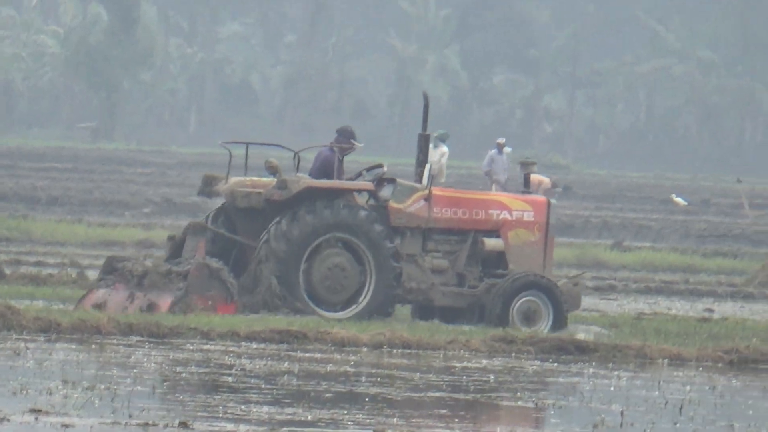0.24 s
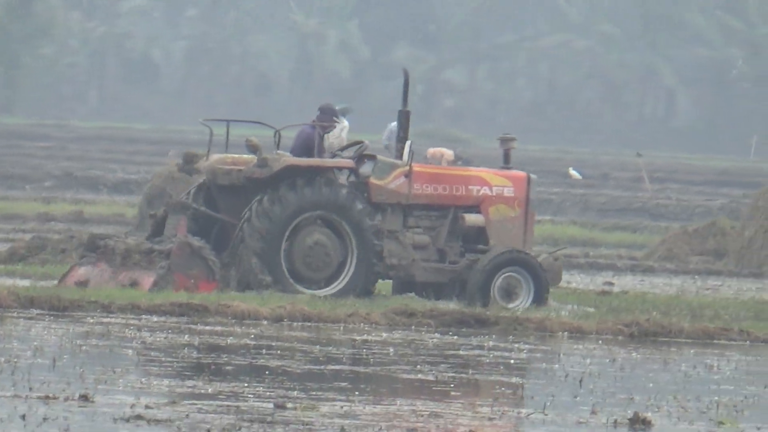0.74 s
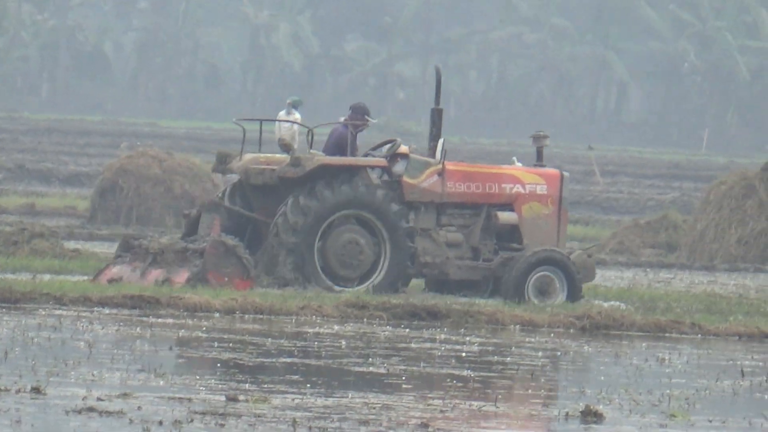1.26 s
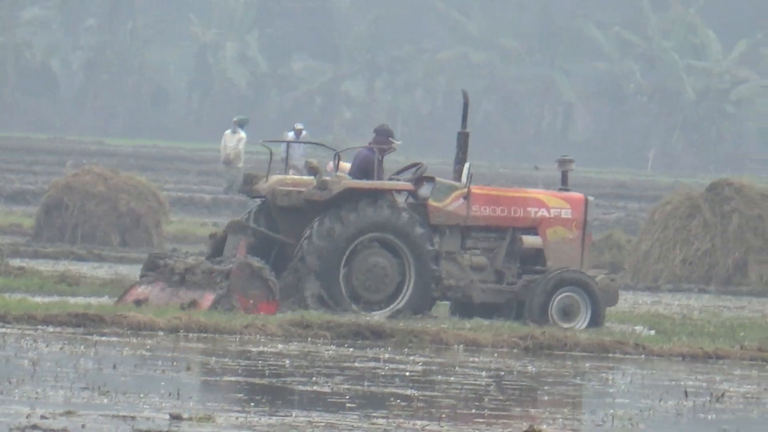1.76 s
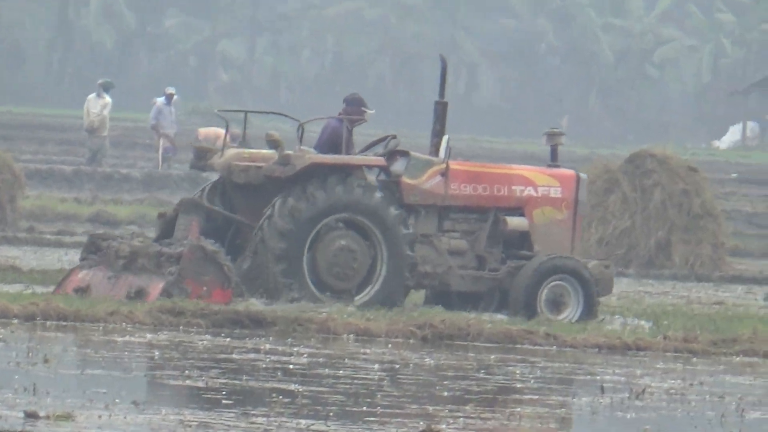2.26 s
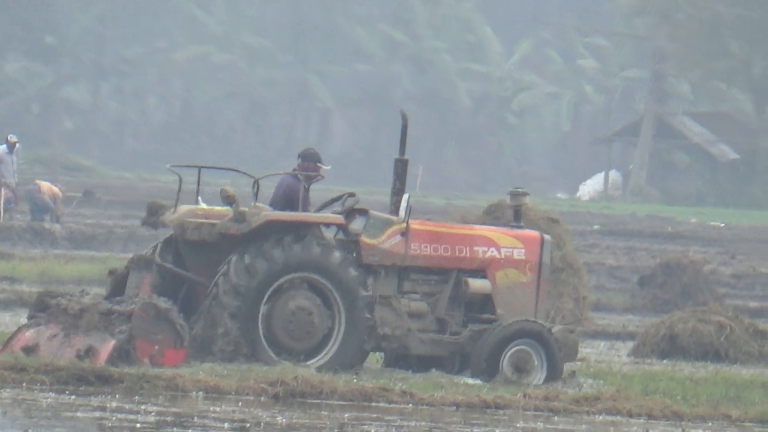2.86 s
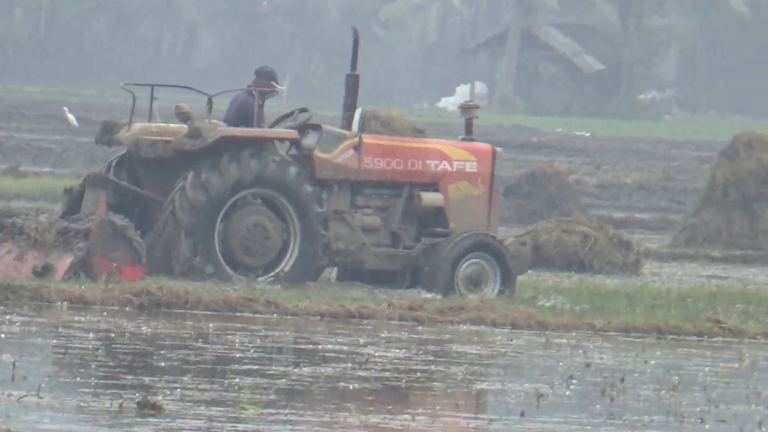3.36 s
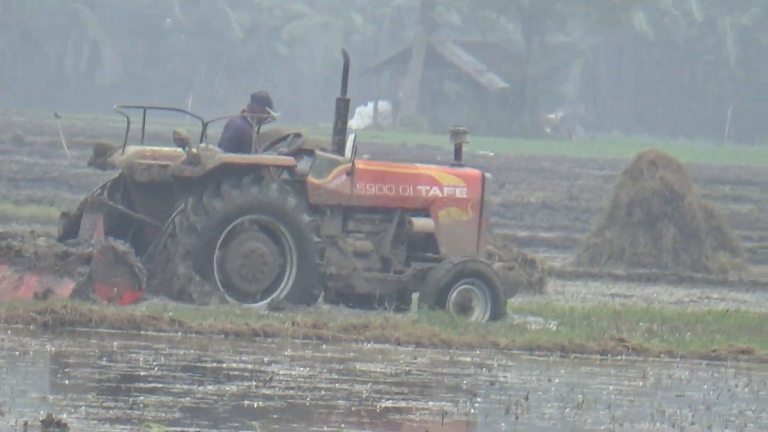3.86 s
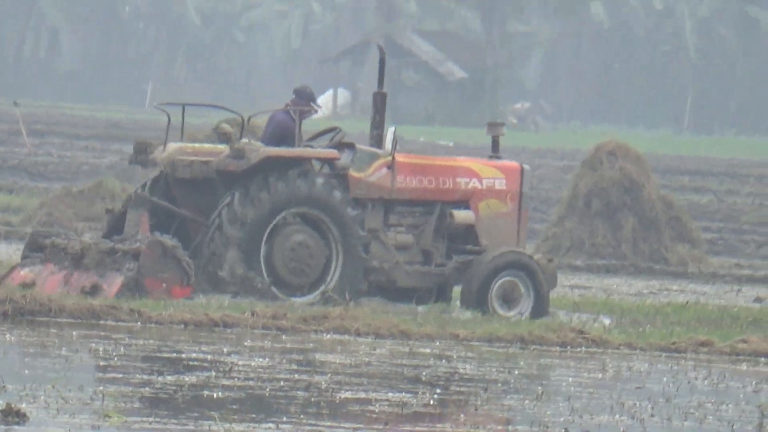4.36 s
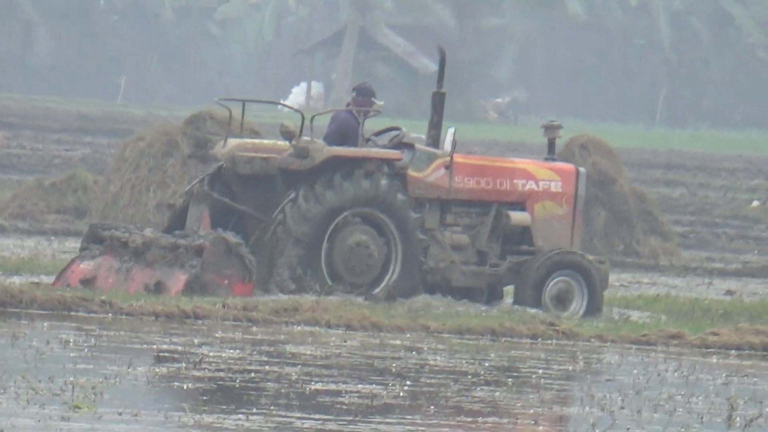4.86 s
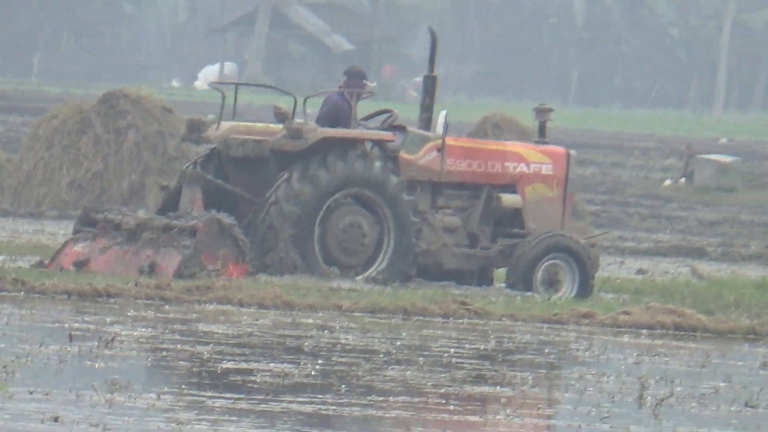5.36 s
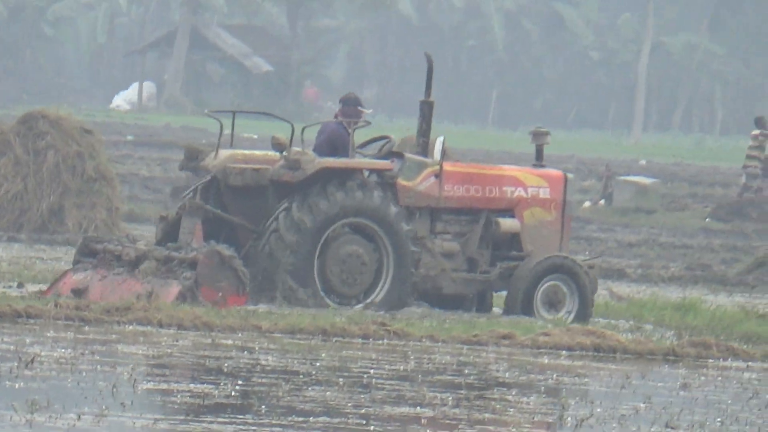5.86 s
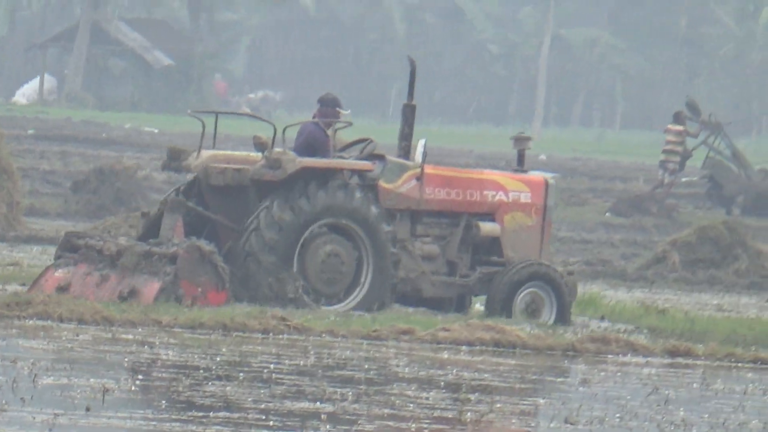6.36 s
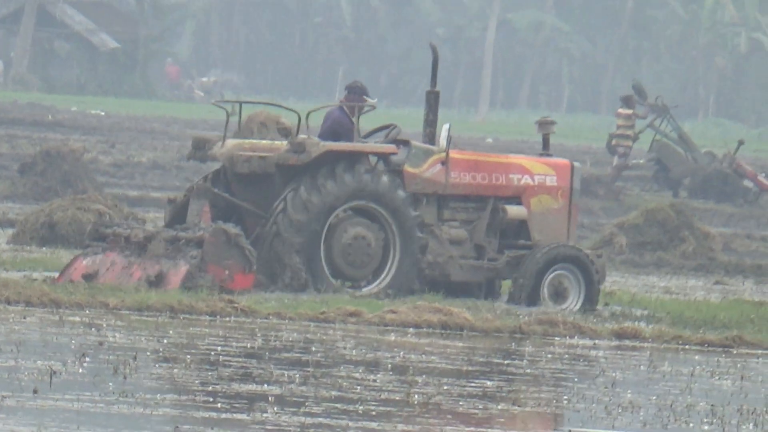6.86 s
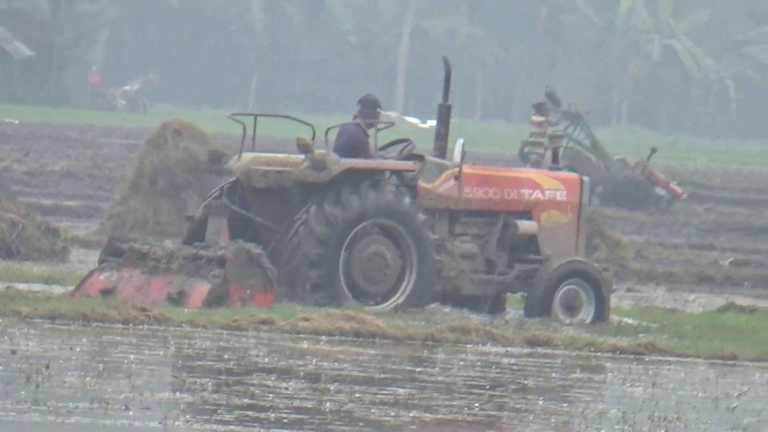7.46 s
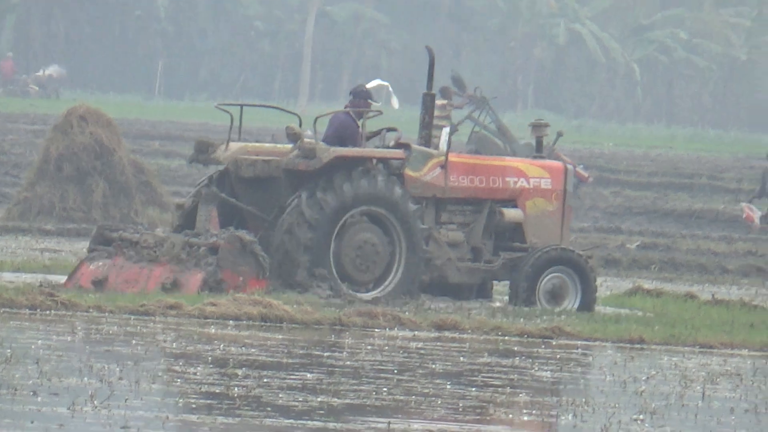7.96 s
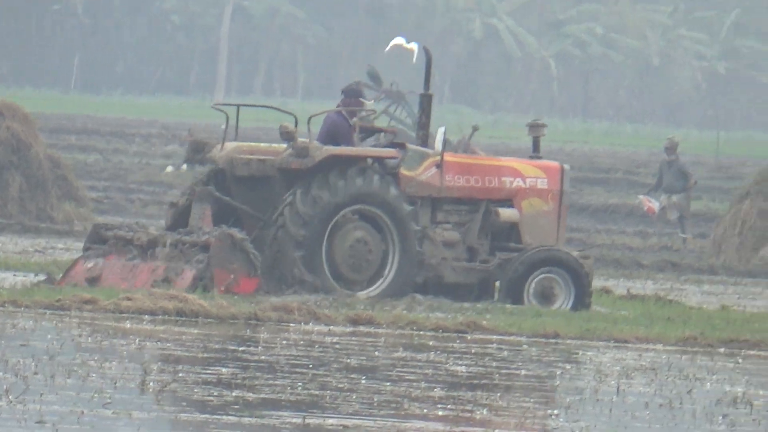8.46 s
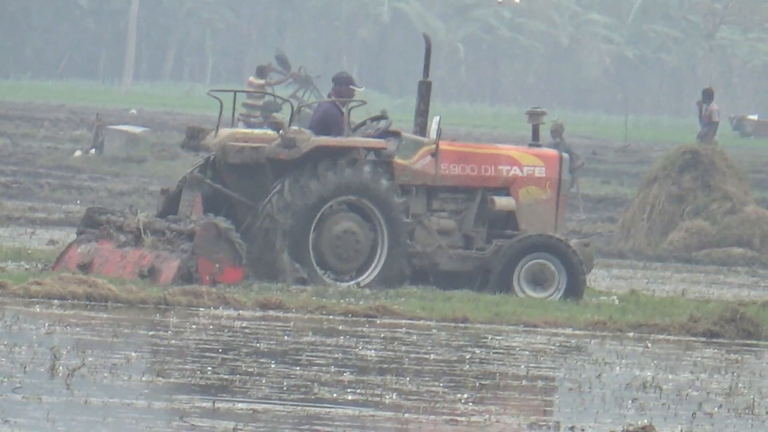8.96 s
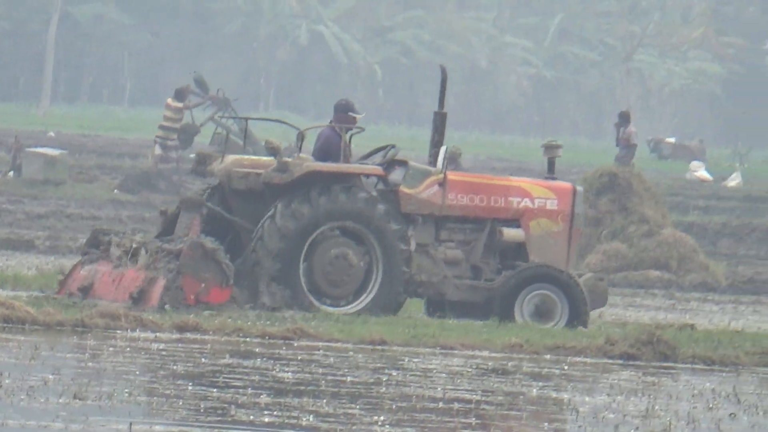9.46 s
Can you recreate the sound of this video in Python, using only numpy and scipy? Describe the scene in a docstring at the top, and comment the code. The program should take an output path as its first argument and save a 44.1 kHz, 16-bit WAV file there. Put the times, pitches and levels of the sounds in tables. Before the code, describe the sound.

Outdoors in a flooded field, a distant diesel tractor runs at steady medium speed, pulling a tiller: soft exhaust puffs, metallic clatter, ticking valve, gear whine and hissing, splashing muddy water. A small bird chirps thinly. After about three seconds, strong wind rumbles, thumps and slaps the unshielded stereo microphone, while the machine becomes fainter but never changes pace.

```python
"""From the start a distant three-cylinder diesel drags a tiller through a flooded field at about 1500 rpm.
Each engine cycle shapes noise into exhaust puffs, knocks and valve ticks; sine tones and noise make gear whine.
Muddy water hisses as filtered noise, a broad hiss swells twice, loose parts tap and a small bird whistles in sines.
From about three seconds wind noise swells, with low thumps, brighter flaps and sharp slaps on the microphone.
The machine grows fainter after that, and some valve ticks land much harder near 1, 5 and 9 seconds."""
import sys
import numpy as np
from scipy import signal
from scipy.fft import rfft, irfft, next_fast_len
from scipy.io import wavfile
from scipy.ndimage import uniform_filter1d, minimum_filter1d

SR = 44100
rng = np.random.default_rng(int(sys.argv[2]) if len(sys.argv) > 2 else 0)


def store_pcm(level_fs):
    """Save levels as 16-bit WAV."""
    pcm = np.round(np.clip(level_fs, -1, 1) * 32767).astype(np.int16)
    wavfile.write(sys.argv[1], SR, np.atleast_2d(pcm).T)


N = 428201
TIME = np.arange(N) / SR  # seconds

# crankshaft speed: (time_s, speed_rpm)
CRANK_SPEED = [(0.0, 1509.2), (1.5, 1505.3), (2.3, 1496.6), (3.2, 1506.2), (4.9, 1502.6), (5.9, 1509.5),
               (6.8, 1512.2), (7.8, 1508.8), (8.8, 1504.9), (9.7, 1504.2)]
START_CYCLE = -.326  # place in the engine cycle at the start
# level of the machine, which falls as it draws past: (time_s, level_db)
MACHINE_LEVEL = [(0, -36.5), (1.7, -35), (3.3, -36.5), (4.1, -40.5), (4.75, -42), (5.35, -40.5), (6.1, -43),
                 (6.8, -42), (7.55, -43.5), (8.4, -40), (8.72, -44), (9.1, -42), (9.71, -41.5)]

# exhaust puff of each cylinder: (place_in_cycle_0_to_1, relative_level_db)
CYLINDER_PUFFS = [(.055, -4.5), (.37, -6), (.7, -13)]
PUFF_RISE_S, PUFF_DECAY_S = 0.004, 0.0059
# exhaust when the machine is at its mean level; dB of exhaust per dB of machine
EXHAUST_DB, EXHAUST_SLOPE = -32.5, 0.56
# tone of the exhaust gas: (pitch_hz, relative_level_db)
EXHAUST_TONE = [(25, -40), (50, -18), (110, 2.5), (190, -4.5), (290, -3), (420, -16), (800, -17.5),
                (1500, -65)]

# knocks within one engine cycle: (place_in_cycle_0_to_1, relative_level_db, decay_s)
BLOCK_KNOCKS = [(.11, 10.5, 0.014), (.56, -2, .006), (.7, 8.5, 0.022), (.815, -4, 0.012)]
# tone of the steady block rattle: (pitch_hz, relative_level_db)
BLOCK_TONE = [(500, -13), (1000, 0.5), (1300, 4), (1550, 2), (1780, 5.5), (2050, -1.5), (2500, 1),
              (3100, -2), (3650, -10.5), (4500, -15), (5500, -22.5), (8000, -24), (15000, -62)]
# tone of the block knocks: (pitch_hz, relative_level_db)
KNOCK_TONE = [(800, 7), (1800, -10), (2400, 17), (3200, 16.5), (4200, -67), (6500, -20), (8300, 8),
              (10000, -3), (12000, -38.5), (15500, -36)]

# strength of the loose valve before trimming: (time_s, bright_snap_db, hollow_clack_db)
VALVE_TICKS = [(.11, -48, -37), (.26, -48, -35), (.5, -37, -35), (.66, -39, -37), (.82, -33, -31),
               (1.14, -39, -30.5), (1.5, -38, -33), (1.78, -38, -34), (2.02, -37, -32), (2.58, -40, -34),
               (2.74, -46, -38), (2.98, -48, -37), (3.22, -41, -33), (3.54, -43, -39), (3.75, -39, -37),
               (4.17, -48, -43), (4.65, -41, -39), (4.97, -46, -40), (5.21, -45, -37), (5.37, -39, -35),
               (5.6, -44, -39), (6.01, -54, -46), (6.4, -49, -41), (6.96, -48, -41), (7.2, -41, -36),
               (7.44, -41, -38), (7.6, -48, -40.5), (8.23, -42.5, -36), (8.55, -49, -39), (8.95, -43, -37),
               (9.19, -48, -37), (9.35, -44, -37), (9.67, -44, -36)]
TICK_SCATTER_DB, TICK_JITTER_S = 1.5, .0005  # chance in strength; chance in timing of every cyclic blow
# tone of the valve snap: (pitch_hz, relative_level_db)
VALVE_TONE = [(3500, -22), (4900, -13), (5600, -1), (6400, -12), (7200, -3), (8300, 0), (9400, 0),
              (10200, -3), (11200, -10.5), (13300, -17.5), (14500, -28), (15500, -35)]
# tone of the valve cover: (pitch_hz, relative_level_db)
COVER_TONE = [(800, -14), (1300, -5), (1800, -5), (2050, -1.5), (2280, 2), (2650, -1.5), (3050, -3),
              (3500, -12), (4200, -19), (6000, -30)]
# the valve now and then lands much harder: (start_s, level_db)
HARD_LANDINGS = [(.983, -30), (1.142, -30), (1.302, -32), (5.132, -29), (5.293, -36), (5.373, -28),
                 (5.452, -30.5), (8.394, -34), (8.632, -36), (8.872, -34), (8.951, -34), (9.271, -36),
                 (9.511, -36)]
# tone of a hard landing: (pitch_hz, relative_level_db)
HARD_TICK_TONE = [(1500, -12), (2000, -3), (2280, 3), (2700, -3), (3400, -2), (4100, -16), (4900, -17),
                  (5600, -13), (6500, -25), (9000, -40)]
HARD_TICK_DECAY_S = .003

# rings of the tappet at the mean clack strength: (pitch_hz, width_hz, level_db, decay_s)
TAPPET_RINGS = [(2520, 330, -63.5, 0.0016), (9330, 180, -70.5, 0.0076)]
TAPPET_PLACE = .83  # place in the cycle, just before the valve
# level of a thin panel that the tappet sets ringing: (time_s, level_db)
PANEL_LEVEL = [(0, -62), (6.3, -61), (7.1, -56.5), (8.45, -54.5), (9.71, -56.5)]
PANEL_HZ, PANEL_WIDTH_HZ, PANEL_DECAY_S = 3420, 130, .03
# level of the tappet's broad knock on the cover: (time_s, level_db)
TAPPET_KNOCK_LEVEL = [(0, -56), (1, -48), (2.2, -56), (7.5, -57), (8.4, -47), (8.7, -53), (9.71, -50)]

# gear mesh tones: (multiple_of_cycle_rate, relative_level_db)
GEAR_TONES = [(23, -6), (66, -9), (70, -5), (71, -2.5), (102, -3.5)]
# tone of the gearbox casing: (pitch_hz, relative_level_db)
GEARBOX_TONE = [(300, -16), (480, -10), (640, -3), (740, -2.5), (820, .5), (900, -1), (1000, -11),
                (1300, -25)]
# howl of the casing compared with the machine: (time_s, relative_level_db)
HOWL_LEVEL = [(0, -1.5), (3, -5), (5.5, -5), (8.2, -1.5), (9.71, 1)]

# tone of the spray in the middle: (pitch_hz, relative_level_db)
SPRAY_TONE = [(2000, 5.5), (4200, 2.5), (5200, 2.5), (7000, 1), (8400, 3.5), (9600, 1), (10600, -4.5),
              (11700, -13), (14000, -18), (15700, -23)]
# tone of the spray that differs between the ears: (pitch_hz, relative_level_db)
SPRAY_SIDE_TONE = [(2000, -1), (4500, 8), (7000, 3.5), (8500, 1), (10000, -42), (15000, -50)]
# spray when the machine is at its mean level; dB of spray per dB of machine
SPRAY_DB, SPRAY_SLOPE = -50, 0.85
# the tines throw up a sheet of water: (peak_s, level_db, half_length_s)
WATER_SPLASHES = [(.95, -48, 0.6), (1.726, -46, 0.35), (5.25, -52, 0.4)]
# one sheet lands at once and patters out
SMACK_S, SMACK_DB, SMACK_RISE_S, SMACK_DECAY_S = 2.43, -40.5, .035, .22
# the hiss dips briefly: (middle_s, depth_db, half_length_s)
HISS_DIPS = [(6.257, -5, 0.076), (8.72, -3, 0.26)]
# a broad hiss swells: (peak_s, level_db, half_length_s)
HISS_SWELLS = [(0.305, -49, .4), (3.1, -48.5, 0.53)]
# tone of the swelling hiss: (pitch_hz, relative_level_db)
HISS_SWELL_TONE = [(2500, -20), (3600, 4), (4300, 2), (5200, -7), (7000, -28)]

# loose parts that rattle at random: (pitch_hz, width_hz, level_relative_to_machine_db)
LOOSE_PARTS = [(1426, 270, -13.5), (1760, 240, -16.5), (2560, 230, -20), (3114, 380, -15.5),
               (3970, 490, -19)]
RATTLE_PER_S, RATTLE_SCATTER_DB, RATTLE_DECAY_S = 40, 3, .004
# loose steel on the tiller: (start_s, relative_level_db, pitch_hz, width_hz, decay_s)
STEEL_CLANKS = [(2.418, -23, 1900, 1000, .003), (2.418, -25.5, 4400, 1300, .002),
                (2.418, -31, 8300, 900, .002), (3.441, -23, 1900, 900, .002), (3.822, -34, 2770, 50, .02),
                (3.853, -29, 1500, 900, .008), (4.974, -31.5, 2230, 70, .007)]

# strength of the wind on the microphone before trimming: (time_s, level_db)
WIND_LEVEL = [(0, -24.5), (.45, -27.5), (.9, -25.5), (1.4, -28), (2.7, -23.5), (3.05, -18), (4.2, -17.5),
              (4.42, -17.5), (4.65, -16.5), (6.5, -18), (6.85, -17), (7.1, -17), (8.3, -18), (8.75, -18),
              (9.71, -20)]
# the wind dips between eddies: (middle_s, depth_db, half_length_s)
WIND_DIPS = [(1.9, -4, .03), (2.88, -3, .02), (3.905, -5, .03), (4.375, -5, .04), (6.79, -4, .04),
             (6.98, -6, .02), (7.6, -3, .02)]
# gusts that swell above the wind, before trimming: (peak_s, level_db)
WIND_GUSTS = [(3.14, -25), (6.25, -24), (6.53, -15.5), (8.61, -17)]
# eddies that thump the microphone, before trimming: (peak_s, rumble_db, flap_db)
WIND_BUFFETS = [(0.019, -15.0, -30.0), (0.108, -14.5, -34.0), (1.683, -15.5, -28.5), (2.819, -17.5, -22.5),
                (2.945, -16.0, -21.5), (3.039, -13.5, -27.0), (3.258, -15.5, -21.5), (3.341, -17.5, -19.0),
                (3.412, -13.5, -21.0), (3.477, -14.5, -22.0), (3.833, -14.0, -19.0), (4.014, -14.0, -20.5),
                (4.092, -12.0, -22.0), (4.191, -13.5, -20.5), (4.297, -13.5, -20.0), (4.677, -15.0, -16.5),
                (4.887, -15.0, -20.0), (4.973, -14.0, -20.5), (5.199, -16.5, -21.0), (5.413, -13.0, -17.0),
                (5.553, -14.0, -27.0), (5.627, -14.0, -24.5), (5.7, -13.0, -22.5), (5.772, -17.0, -18.0),
                (5.829, -16.5, -20.5), (5.986, -14.5, -21.0), (6.207, -14.0, -19.0), (6.282, -15.5, -19.0),
                (6.438, -15.5, -15.0), (6.571, -12.5, -22.0), (7.025, -16.0, -18.5), (7.099, -15.5, -17.0),
                (7.237, -14.5, -19.0), (7.324, -16.0, -19.5), (7.449, -13.5, -21.0), (7.712, -16.0, -17.0),
                (8.007, -19.0, -19.5), (8.565, -12.5, -25.0), (8.754, -15.5, -24.0), (9.031, -16.0, -20.0),
                (9.193, -17.0, -19.5), (9.303, -16.5, -19.5), (9.68, -13.5, -22.0)]
GUST_S, BUFFET_S = 0.089, .027  # half lengths of a gust and an eddy
RUMBLE_DB, FLUTTER_DB, SURGE_DB = -3, 5, 2.5  # rumble relative to the wind; quick flutter; slower surges
THUMP_DB, FLAP_DB, GUST_FLAP_DB = -5.5, -7, -13  # trims of eddy rumble and flap; gust flap relative to gust
# small eddies come all the time and grow faster than the wind
EDDY_DB, EDDY_AT_WIND_DB, EDDY_SLOPE, EDDY_SCATTER_DB = -33, -16.5, 2.2, 3
# tone of the rumble shared by both ears: (pitch_hz, relative_level_db)
WIND_MID_TONE = [(12, 3.5), (25, -13), (60, 0), (110, 0.5), (170, -2), (270, -10), (420, -22), (700, -32),
                 (1500, -39.5)]
# tone of the rumble that differs between the ears: (pitch_hz, relative_level_db)
WIND_SIDE_TONE = [(12, -26), (25, -17), (60, -7), (130, -4), (270, -8), (450, -20.5), (750, -28),
                  (1500, -42.5)]
# tone of the flapping eddies: (pitch_hz, relative_level_db)
EDDY_TONE = [(50, -24), (150, -1), (280, 4.5), (450, -5.5), (700, -15), (1100, -31), (2500, -42),
             (5000, -70)]
# change in the deepest part of the rumble: (time_s, change_db)
WIND_BASS_LEVEL = [(0, 1), (3, 0), (5.6, -1), (6, -0.5), (7.8, -2.5), (8.6, -1.5), (9.71, 0)]
WIND_BASS_HZ = 90
EVEN_S = .07  # wind noise keeps its strength over this time
# sharp slaps of air on the ports, before trimming: (start_s, level_db)
AIR_SLAPS = [(2.816, -22), (3.221, -28), (4.284, -27), (4.675, -27), (5.346, -25), (6.068, -27),
             (6.242, -26), (6.544, -23), (6.843, -24), (6.928, -27), (7.245, -25), (7.321, -23),
             (7.491, -23), (7.975, -20), (8.117, -25), (9.024, -24)]
# tone of a slap: (pitch_hz, relative_level_db)
SLAP_TONE = [(250, -3), (480, 0), (750, -2), (1150, -14), (2500, -32)]
SLAP_DB, SLAP_DECAY_S = -1.5, .004  # trim and fading time

# a small bird far off: (peak_s, pitch_hz, level_db)
BIRD_CHIRPS = [(.3, 4580, -45.5), (.44, 4720, -43.5), (.555, 4490, -46), (.645, 4300, -45),
               (2.37, 4250, -46), (2.83, 4400, -47), (2.94, 4270, -42), (3.04, 4000, -41),
               (3.79, 4750, -45.5)]
TOP_HZ = 15750  # pitches above this are cut


def undb(db):
    """Turn decibels into gain."""
    return np.exp(np.asarray(db) * (np.log(10) / 20))


def unit(x):
    """Scale to an average strength (rms) of 1."""
    return x / np.sqrt(np.mean(x ** 2))


def above_mean(db):
    """How far a level stands above its own mean."""
    return db - db.mean()


def curve(table, axis=1):
    """Join one column of a table by straight lines in time."""
    rows = np.array(table, float)
    return np.interp(TIME, rows[:, 0], rows[:, axis])


def noise():
    """White noise, an even hiss."""
    return rng.standard_normal(N)


def shape(x, gain):
    """Filter by a gain that depends on frequency; rms 1."""
    size = next_fast_len(x.shape[-1] + 4096, real=True)
    hz = np.maximum(np.arange(size // 2 + 1) * SR / size, 1)
    return unit(irfft(rfft(x, size) * gain(hz), size)[..., :x.shape[-1]])


def colour(x, tone):
    """Filter through a table of tone that falls away beyond its ends; rms 1."""
    hz, db = np.transpose(tone)

    def gain(f):
        ends = np.minimum(1, np.minimum(f / hz[0], hz[-1] / f)) ** 2
        return undb(np.interp(np.log(f), np.log(hz), db)) * ends
    return shape(x, gain)


def ring(x, hz, width_hz):
    """A resonance with steep skirts; rms 1."""
    return shape(x, lambda f: 1 / (1 + 1j * (f / hz - hz / f) * hz / (2 * width_hz)) ** 2)


def walk(rate):
    """Smooth chance with about `rate` turns a second; rms 1."""
    k = max(int(SR / rate), 2)
    steps = np.repeat(rng.standard_normal(N // 32)[:N // k + 1], k)
    return unit(uniform_filter1d(uniform_filter1d(steps, k), k)[:N])


def stereo(mid, side, side_db=0, left_db=0):
    """Left and right from shared and opposite parts; left_db lifts left over right."""
    side = side * undb(side_db)
    return np.array([(mid + side) * undb(left_db / 2), (mid - side) * undb(-left_db / 2)])


def around(s):
    """Up to a quarter second on either side of a moment: its samples and their age."""
    span = slice(max(int((s - 1 / 4) * SR), 0), int((s + 1 / 4) * SR))
    return span, TIME[span] - s


def swell(s, db, length):
    """Envelope that rises to a level at a moment and sinks again."""
    return undb(db) * np.exp(-np.minimum(((TIME - s) / length) ** 2, 50))


def burst(age, attack, decay):
    """Envelope of a blow: a quick rise to age 0, then an exponential fall."""
    return np.exp(-np.where(age < 0, (age / attack) ** 2, age / decay))


def crack(age, decay, tone):
    """A short burst of noise with a sudden start; strength set by its envelope."""
    envelope = burst(age, .0006, decay)
    return colour(rng.standard_normal(len(age)) * envelope, tone) * np.sqrt(np.mean(envelope ** 2))


def each_cycle(cycles, cycle_hz, place, attack, decay, scatter_db):
    """Envelope of a blow once per engine cycle, with chance in its strength and timing."""
    turn = cycles - place + 1 + 1 / 4  # each turn opens a quarter cycle before its blow
    size, late = np.clip(rng.standard_normal((256, 2)), -2, 2)[turn.astype(int)].T
    age = (turn % 1 - 1 / 4) / cycle_hz + TICK_JITTER_S * late
    return undb(scatter_db * size) * burst(age, attack, decay)


def steel(cycles, cycle_hz, repeat_db):
    """Vibration of struck steel: noise partly the same on every engine cycle, partly new."""
    sample = ((cycles + 1 / 2) % 1 / cycle_hz * SR).astype(int)
    repeated = rng.standard_normal(sample.max() + 1)[sample]
    return unit(undb(repeat_db) * repeated + noise())


def even(x):
    """Hold the strength of noise steady while its waves stay irregular; rms about 1."""
    return x / np.sqrt(uniform_filter1d(x ** 2, int(EVEN_S * SR)) + 1e-9)


def exhaust(cycles, cycle_hz):
    """Three soft, uneven puffs per cycle swell the rush of gas in the silencer."""
    puffs = 0
    for place, db in CYLINDER_PUFFS:
        puffs = puffs + undb(db) * each_cycle(cycles, cycle_hz, place, PUFF_RISE_S, PUFF_DECAY_S, scatter_db=7.5)
    gas = colour(steel(cycles, cycle_hz, repeat_db=-13.0) * (1 + puffs), EXHAUST_TONE)
    level_db = EXHAUST_DB + EXHAUST_SLOPE * above_mean(curve(MACHINE_LEVEL))
    return undb(level_db) * stereo(gas, 0)


def clatter(cycles, cycle_hz):
    """The block rattles all the time; injectors and tappets knock at fixed places in the cycle."""
    grain = undb(1.1 * walk(260))
    mid = colour(steel(cycles, cycle_hz, repeat_db=-6.5) * grain, BLOCK_TONE)
    side = colour(noise() * grain, BLOCK_TONE)
    rattle = stereo(mid, side, side_db=-7.5, left_db=3.5)
    blows = 0
    for place, db, decay in BLOCK_KNOCKS:
        blows = blows + undb(db) * each_cycle(cycles, cycle_hz, place, .0014, decay, scatter_db=2.2)
    knocks = stereo(colour(steel(cycles, cycle_hz, repeat_db=3.5) * blows, KNOCK_TONE), 0, left_db=3)
    return undb(curve(MACHINE_LEVEL)) * (undb(-2.0) * rattle + undb(-18.0) * knocks)


def valve(cycles, cycle_hz):
    """One loose valve snaps once per cycle, and its cover answers with a hollow clack."""
    snap_shape = each_cycle(cycles, cycle_hz, .003, .0014, .0027, scatter_db=TICK_SCATTER_DB)
    clack_shape = each_cycle(cycles, cycle_hz, .022, .0025, .004, scatter_db=TICK_SCATTER_DB)
    snap = colour(steel(cycles, cycle_hz, repeat_db=-8) * snap_shape, VALVE_TONE)
    clack = colour(steel(cycles, cycle_hz, repeat_db=-8) * clack_shape, COVER_TONE)
    snap = undb(curve(VALVE_TICKS) - 13) * snap
    clack = undb(curve(VALVE_TICKS, axis=2) - 11) * clack
    return stereo(snap, 0, left_db=-3.0) + stereo(clack, 0, left_db=6.5)


def hard_ticks():
    """The hardest landings of the valve crack through the whole cover."""
    out = np.zeros(N)
    for s, db in HARD_LANDINGS:
        span, age = around(s)
        out[span] += undb(db) * crack(age, HARD_TICK_DECAY_S, HARD_TICK_TONE)
    return stereo(out, 0, left_db=6)


def tappet(cycles, cycle_hz):
    """A lighter knock leads each snap; it raps the cover, rings at a few pitches and sets a thin panel singing."""
    def knock(decay):
        return noise() * each_cycle(cycles, cycle_hz, TAPPET_PLACE, .0015, decay, scatter_db=3)
    rings = sum(undb(db) * ring(knock(decay), hz, width) for hz, width, db, decay in TAPPET_RINGS)
    rings = undb(.7 * above_mean(curve(VALVE_TICKS, axis=2))) * rings  # follows the hollow clack
    panel = undb(curve(PANEL_LEVEL)) * ring(knock(PANEL_DECAY_S), PANEL_HZ, PANEL_WIDTH_HZ)
    cover = undb(curve(TAPPET_KNOCK_LEVEL)) * colour(knock(HARD_TICK_DECAY_S), COVER_TONE)
    return stereo(rings + panel + cover, 0, left_db=4)


def gears(cycles):
    """Meshing teeth whine and waver with the load; the gearbox casing howls around them."""
    twist = 0.011 * walk(5)  # the drive line winds up and lets go (engine cycles)
    whine = 0
    for multiple, db in GEAR_TONES:
        strength = undb(db + 3.5 * walk(11))
        whine = whine + strength * np.sin(2 * np.pi * multiple * (cycles + twist) + .5 * walk(35))
    howl = undb(curve(HOWL_LEVEL)) * colour(noise(), GEARBOX_TONE)
    return undb(curve(MACHINE_LEVEL)) * stereo(howl + undb(-9.0) * whine, 0, left_db=1.0)


def rattles():
    """Linkage and guards chatter in short, irregular taps that ring at their own pitches."""
    out = 0
    for hz, width, db in LOOSE_PARTS:
        taps = (rng.random(N) < RATTLE_PER_S / SR) * undb(RATTLE_SCATTER_DB * np.clip(noise(), -2, 2))
        # each tap leaves energy that dies away
        power = signal.lfilter([1], [1, -np.exp(-2 / (RATTLE_DECAY_S * SR))], taps ** 2)
        out = out + undb(db) * ring(noise() * np.sqrt(power), hz, width)
    return stereo(undb(curve(MACHINE_LEVEL)) * out, 0, left_db=5.0)


def spray():
    """The tines fling muddy water: a grainy hiss that swells with each splash and dips briefly at times."""
    drops = undb(1.17 * walk(45) + 1.76 * walk(700))
    mid = colour(noise() * drops, SPRAY_TONE)
    side = colour(noise() * drops, SPRAY_SIDE_TONE)
    dip_db = sum(depth_db * swell(s, 0, length) for s, depth_db, length in HISS_DIPS)
    churn = undb(SPRAY_DB + SPRAY_SLOPE * above_mean(curve(MACHINE_LEVEL)) + dip_db)
    splashes = sum(swell(s, db, length) for s, db, length in WATER_SPLASHES)
    splashes = splashes + undb(SMACK_DB) * burst(TIME - SMACK_S, SMACK_RISE_S, SMACK_DECAY_S)
    return np.hypot(churn, splashes) * stereo(mid, side, side_db=-7.5, left_db=-0.5)


def hiss_swells():
    """A broad, unsteady hiss, strongest around 3.6-4.3 kHz, swells near 0.3 and 3.1 s."""
    mid, side = colour(rng.standard_normal((2, N)) * undb(3.2 * walk(120)), HISS_SWELL_TONE)
    level = sum(swell(s, db, length) for s, db, length in HISS_SWELLS)
    return level * stereo(mid, side, side_db=-2)


def clanks():
    """Now and then loose steel on the tiller knocks or squeaks: short bursts of ringing noise."""
    blows = np.zeros(N)
    for s, db, hz, width, decay in STEEL_CLANKS:
        span, age = around(s)
        blows[span] += undb(db) * burst(age, .001, decay) * ring(rng.standard_normal(len(age)), hz, width)
    return stereo(blows, 0)


def wind():
    """Turbulence rumbles and thumps on the ports; eddies add a brighter flap that differs between them."""
    wind_db = curve(WIND_LEVEL) + sum(depth_db * swell(s, 0, length) for s, depth_db, length in WIND_DIPS)
    gusts = sum(swell(s, db, GUST_S) for s, db in WIND_GUSTS)
    steady = undb(RUMBLE_DB) * np.hypot(undb(wind_db), gusts)
    surge = np.tanh(walk(30))  # shared by the rumble and the small eddies
    thumps, hard_flaps = np.zeros((2, N))
    for s, rumble_db, flap_db in WIND_BUFFETS:
        span, age = around(s)
        bump = np.exp(-(age / BUFFET_S) ** 2)
        thumps[span] += undb(rumble_db + THUMP_DB) * bump
        hard_flaps[span] += undb(flap_db + FLAP_DB) * bump
    flutter = undb(FLUTTER_DB * np.tanh(walk(90)))
    mid = even(colour(noise() * flutter, WIND_MID_TONE))
    side = even(colour(noise() * flutter, WIND_SIDE_TONE))
    rumble = stereo(mid, side, side_db=-5)
    bass = signal.sosfiltfilt(signal.butter(2, WIND_BASS_HZ, fs=SR, output="sos"), rumble)
    rumble = rumble + (undb(curve(WIND_BASS_LEVEL)) - 1) * bass
    small_flaps = undb(EDDY_DB + EDDY_SLOPE * (wind_db - EDDY_AT_WIND_DB) + EDDY_SCATTER_DB * surge)
    # an eddy breaks up into smaller whirls as it passes
    whirls = undb(2.5 * walk(140))
    eddies = np.hypot(small_flaps, hard_flaps + undb(GUST_FLAP_DB) * gusts) * whirls
    flaps = stereo(*even(colour(rng.standard_normal((2, N)), EDDY_TONE)), side_db=2.2)
    return np.hypot(steady * undb(SURGE_DB * surge), thumps) * rumble + eddies * flaps


def slaps():
    """Small, fast eddies slap the two ports, each a little differently."""
    out = np.zeros((2, N))
    for s, db in AIR_SLAPS:
        span, age = around(s)
        mid, side = (crack(age, SLAP_DECAY_S, SLAP_TONE) for _ in range(2))
        out[:, span] += undb(db + SLAP_DB) * stereo(mid, side, side_db=-2)
    return out


def bird():
    """Thin whistles that slide slightly down, blurred by distance."""
    song, blur = np.zeros(N), walk(200)
    for s, hz, db in BIRD_CHIRPS:
        span, age = around(s)
        whistle = np.sin(2 * np.pi * hz * age * (1 - .3 * age) + .35 * blur[span])
        song[span] += undb(db) * np.exp(-(age / .013) ** 2) * whistle
    return stereo(song, 0)


def scene():
    """The crankshaft times the engine and gears; spray, hiss, loose parts, wind and bird join them."""
    cycle_hz = curve(CRANK_SPEED) / (2 * 60)  # one engine cycle takes two turns of the crank
    cycles = START_CYCLE + np.cumsum(cycle_hz) / SR
    engine = sum(part(cycles, cycle_hz) for part in (exhaust, clatter, valve, tappet)) + hard_ticks()
    machine = engine + gears(cycles) + rattles() + clanks()
    return machine + spray() + hiss_swells() + wind() + slaps() + bird()


def record(dry):
    """A limiter ducks both channels together around the loudest peaks; the highest pitches are cut."""
    hold = int(.05 * SR)
    needed = np.minimum(1, undb(-2.6) / (np.abs(dry).max(axis=0) + 1e-9))
    limited = dry * uniform_filter1d(minimum_filter1d(needed, hold), hold)
    return signal.sosfilt(signal.ellip(10, .2, 80, TOP_HZ, fs=SR, output="sos"), limited)


dry = scene()
out = record(dry)
store_pcm(out)
```